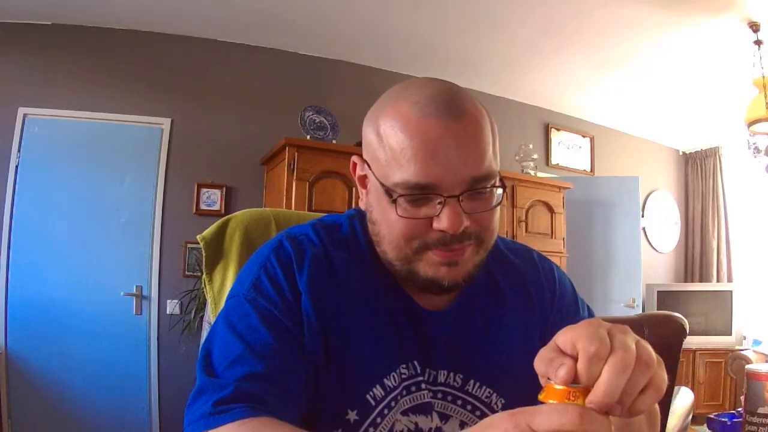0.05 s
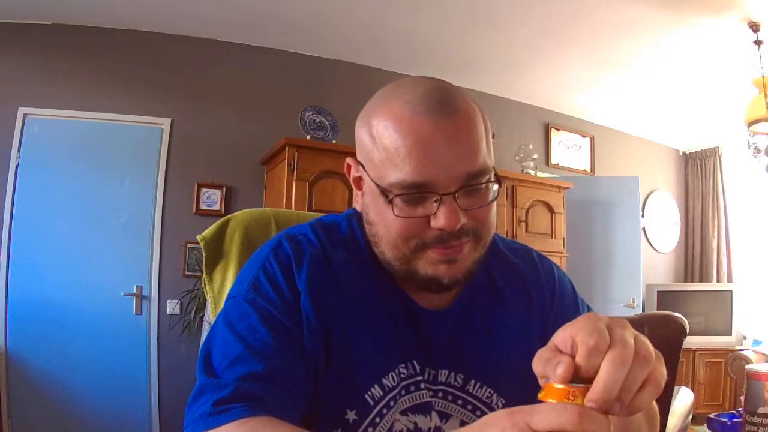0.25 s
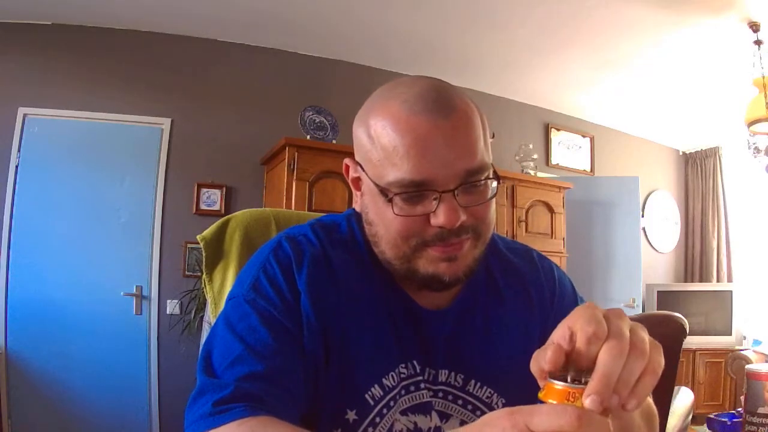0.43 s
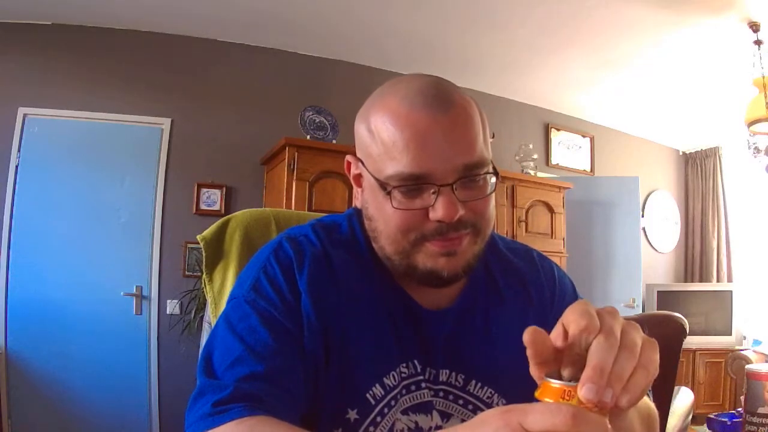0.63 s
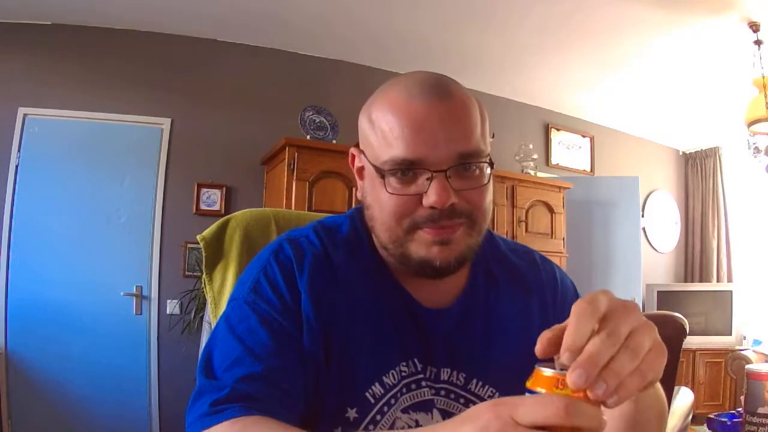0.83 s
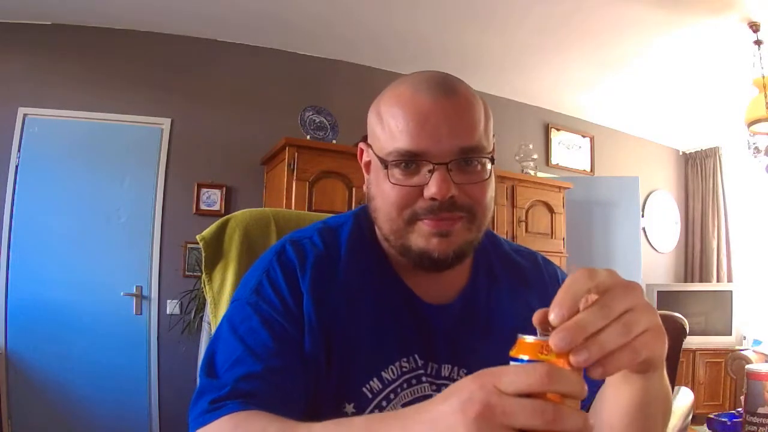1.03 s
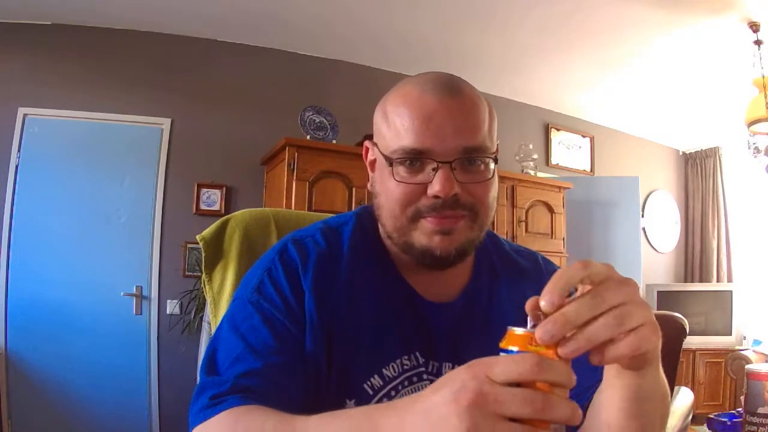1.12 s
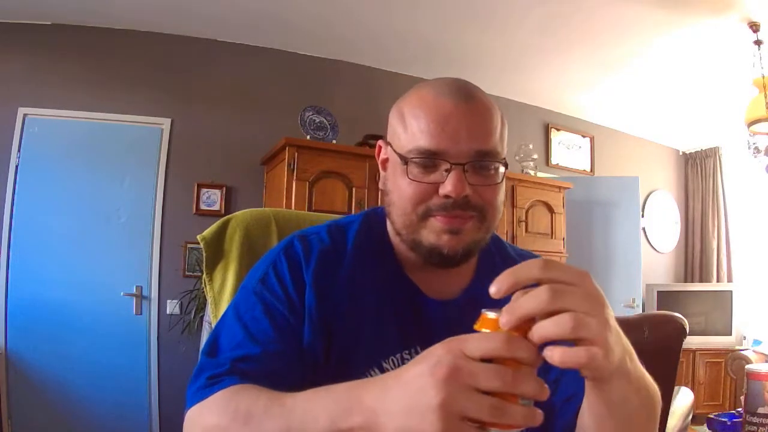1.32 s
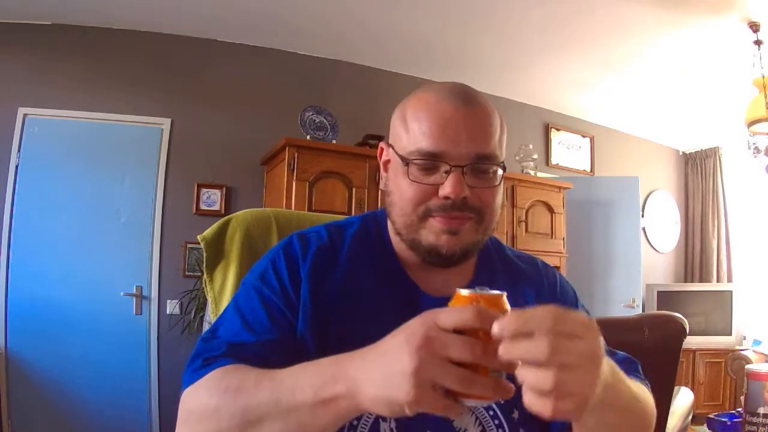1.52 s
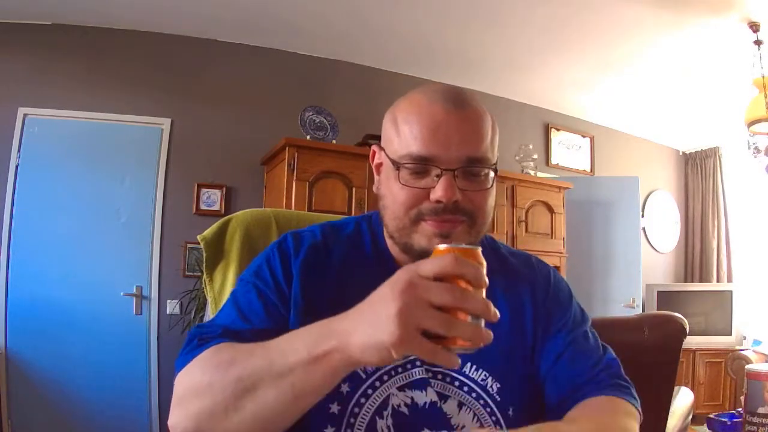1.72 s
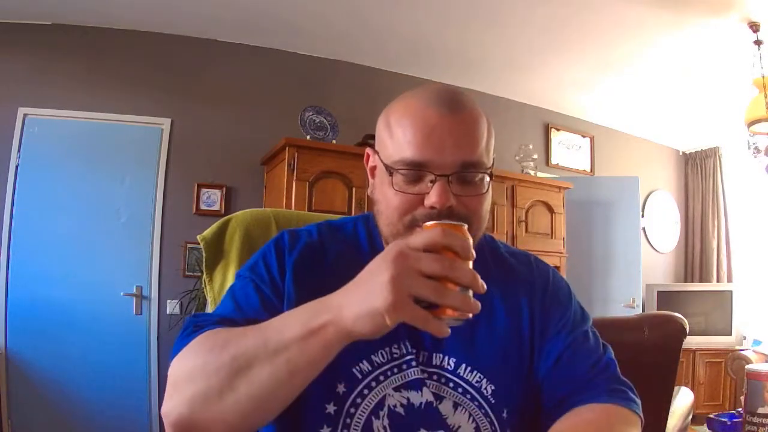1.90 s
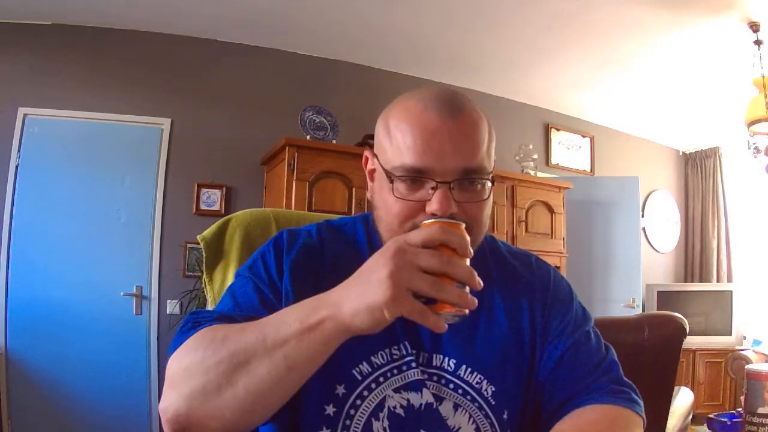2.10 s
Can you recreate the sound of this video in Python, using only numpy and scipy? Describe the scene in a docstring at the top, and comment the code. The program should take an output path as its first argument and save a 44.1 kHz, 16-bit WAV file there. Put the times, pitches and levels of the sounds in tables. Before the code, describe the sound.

A ring-pull can opens at about 0.14 seconds with a bright, hard snap, then a rapid stutter of tearing metal and a hollow pop rising in pitch until 0.25. Hiss fades by 0.5, with lighter clicks and a small tab twang near 0.4. Soft low room hum continues, with faint finger ticks around 1.1, 1.3 and 1.5, and dull chair bumps near 0.8, 1.5 and 2.1. Short room echo, close microphone.

```python
"""Ring-pull can in a quiet living room

A ring-pull can is opened at arm's length over a soft room tone, a low drone and a thin high whine.
The score line tears in a run of slips; each rings the aluminium lid and the air above the drink, whose
note mostly climbs as the hole grows. Gas hisses out and the folded tab twangs; later fingers tick
on the can and the chair bumps. Resonators struck by clicks or fed noise make these; delays add the room.
"""
import sys
import numpy as np
from scipy import signal
from scipy.fft import rfft, irfft
from scipy.io import wavfile

SR = 44100
rng = np.random.default_rng(int(sys.argv[2]) if len(sys.argv) > 2 else 0)


def invert_db(x):
    """Field ratio 10**(x/20) for x, a level in decibels (scalar or array-like)."""
    u = np.asarray(x, float) / 20
    return 10 ** u


def pcm_store(signal):
    """Save signal as 16-bit PCM."""
    levels = np.round(np.clip(np.atleast_2d(signal), -1, 1) * 32767)
    wavfile.write(sys.argv[1], SR, levels.astype(np.int16).T)


N = 94815   # length in samples
TIME_S = np.arange(N) / SR
DETUNE = .03   # random spread of lid and headspace tuning, as an rms share of pitch


def rms_one(x):
    """Scale to rms 1."""
    return x / np.sqrt(np.mean(x ** 2) + 1e-20)


def peak_one(x):
    """Scale to height 1."""
    return x / (np.max(np.abs(x)) + 1e-20)


def add(out, start_s, x):
    """Mix x in at its start time."""
    i = int(start_s * SR)
    out[i:i + len(x)] += x[:N - i]


def high_pass(x, order, cut_hz):
    """Take the bass away below the cut."""
    return signal.sosfilt(signal.butter(order, cut_hz, "high", fs=SR, output="sos"), x)


# Spectral shape of the room tone: pitch_hz [Hz], level_db [dB per Hz, relative]
ROOM_TONE_SHAPE = [(15, -25), (25, -10), (53, -3.5), (84, -10.5), (114, -5), (195, -6.5), (229, -9.5),
                   (301, -8), (624, -13), (714, -15), (887, -17), (1190, -17), (3340, -35.5), (13600, -47),
                   (16000, -50.5)]
# Wavering tones in the room: pitch_hz [Hz], width_hz [Hz], level_db [dB rms]
ROOM_HUM = [(150, 6.3, -64), (300, 9, -68.5)]
ROOM_TONE_DB, ROOM_TONE_CUT_HZ = -51, 36   # rms level, bass cut


def room_tone():
    """Noise coloured to the room's spectrum, with narrow noise bands heard as wavering hums."""
    hz = np.maximum(np.fft.rfftfreq(N, 1 / SR), 1)
    shape_hz, shape_db = np.transpose(ROOM_TONE_SHAPE)
    air_noise, hum_noise = rfft(rng.standard_normal((2, N)))
    colour = invert_db(np.interp(np.log(hz), np.log(shape_hz), shape_db))
    bass_cut = 1 / (1 + (ROOM_TONE_CUT_HZ / hz) ** 4)
    out = invert_db(ROOM_TONE_DB) * rms_one(irfft(air_noise * colour * bass_cut, N))
    for pitch_hz, width_hz, level_db in ROOM_HUM:
        narrow = 1 / (1 + (2 * (hz - pitch_hz) / width_hz) ** 2)
        out += invert_db(level_db) * rms_one(irfft(hum_noise * narrow, N))
    return out


DRONE_HZ, DRONE_DB = 49, -53.5   # centre pitch and level
DRONE_WAVER_DB, DRONE_WAVER_HZ = -0.5, 3.0   # size (sign flips it) and top speed of the level wander


def drone():
    """A low sine whose level and phase follow slow smoothed noise."""
    smooth = signal.butter(2, DRONE_WAVER_HZ, fs=100, output="sos")
    slow = signal.sosfilt(smooth, rng.standard_normal((2, 500)))[:, 200:]   # skip the filter's start
    slow_s = np.arange(300) / 100
    level, phase = (np.interp(TIME_S, slow_s, rms_one(v)) for v in slow)
    wave = np.sin(2 * np.pi * DRONE_HZ * TIME_S + 2.0 * phase)   # phase wander in radians
    return invert_db(DRONE_DB + DRONE_WAVER_DB * level) * wave


# Steady tones of a thin whine: pitch_hz [Hz], level_db [dB peak]
WHINE_TONES = [(13390, -97), (13473.6, -89), (13557, -89), (13640, -99)]


def whine():
    """Close, steady high sines beat together as one thin whine."""
    return sum(invert_db(level_db) * np.sin(2 * np.pi * pitch_hz * TIME_S) for pitch_hz, level_db in WHINE_TONES)


def burst(decay_ms):
    """One sharp click, then sparse uneven ones dying away; unit energy."""
    t = np.arange(SR // 5) / SR
    sparse = rng.standard_normal(len(t)) * (rng.random(len(t)) < .2)
    x = sparse * np.exp(-t * 1000 / decay_ms)
    x[0] = 1.82
    return x / np.sqrt(np.sum(x ** 2))


def ring(clicks, hz, t60_s):
    """A two-pole resonator: a unit click sets a decaying sine of starting height about 1 ringing."""
    radius = invert_db(-60 / (max(t60_s, .003) * SR))   # never rings shorter than 3 ms
    w = 2 * np.pi * hz / SR
    feedback = [1, -2 * radius * np.cos(w), radius * radius]
    return signal.lfilter([0, np.sin(w)], feedback, clicks + 1e-18)


# The air above the drink as the hole opens: time_s [s], pitch_hz [Hz, before detuning], t60_s [s]
HEADSPACE_NOTES = [(.14, 585, 0.015), (.176, 617, 0.017), (0.18, 770, 0.026), (.208, 837, 0.011),
                   (0.2107, 1058, 0.026), (0.218, 902, .025), (.27, 864, .03), (.3, 1093, .045),
                   (.35, 1110, 0.034), (.38, 1180, 0.071), (.41, 1223, 0.033), (.5, 1240, 0.032)]


def headspace(x, at_s):
    """The air above the drink: two resonators in a row give steep skirts, on a slightly unsteady note."""
    time_s, pitch_hz, t60_s = np.transpose(HEADSPACE_NOTES)
    hz = np.interp(at_s, time_s, pitch_hz) * (1 + DETUNE * rng.standard_normal())
    short_ring = ring(x, hz, .007)
    return ring(short_ring, hz, np.interp(at_s, time_s, t60_s))


# Ringing modes of the lid: pitch_hz [Hz, before detuning], level_db [dB, relative within
# its group, before chance], t60_s [s, held to at least 0.003]
LID_MODES = [(1076, -28.5, 0.12), (1360, -17.5, 0.024), (1697, -2, 0.01), (1857, 1.5, 0.015),
             (2039, -6.5, 0.016), (2577, -16.5, 0.014), (3256, 0.5, 0.0073), (3577, -5, 0.044),
             (3913, 5.5, 0.012), (4234, 3.5, 0.013), (4500, -1.5, 0.0088), (5045, -2, .015),
             (5730, -4.5, 0.005), (6235, -2.5, 0.022), (7330, -8, 0.0068), (8400, -8, 0.0068),
             (9500, -12, 0.0027), (11110, -10.5, 0.0067), (15500, -34.5, 0.0076)]
MODE_SPREAD_DB = 1.5   # chance in each mode's strength, rms
LID_CUT_HZ = 950   # the lid radiates little below its lowest mode


def lid(x, low_hz, high_hz):
    """The bending lid: one group of modes rings, with fresh strengths and tunings at every strike."""
    out = 0
    for k, (pitch_hz, level_db, t60_s) in enumerate(LID_MODES):
        if low_hz <= pitch_hz < high_hz:
            strength = invert_db(level_db + MODE_SPREAD_DB * rng.standard_normal()) * (-1) ** k
            hz = pitch_hz * (1 + DETUNE * rng.standard_normal())
            out = out + strength * ring(x, hz, t60_s)
    return high_pass(out, 4, LID_CUT_HZ)


CRACK_DB, CRACK_HZ, AIRY_DB = 8.5, 8050, -20.5   # snap gain before scaling, its dulling, its airy top


def crack(x):
    """The unresonant snap: a dulled click with a little of its airy top."""
    dulling = signal.butter(2, [3000, CRACK_HZ], "band", fs=SR, output="sos")
    airy = np.diff(x, prepend=0)
    return invert_db(CRACK_DB) * (signal.sosfilt(dulling, x) + invert_db(AIRY_DB) * airy)


# Slips of the score line: start_s [s], headspace_db, low_lid_db, middle_lid_db, high_lid_db
# [dB peak of each part, before the can's bass cut]
SCORE_SLIPS = [(.1424, -30, -5, -11, -20), (.146, -32, -13, -22, -28), (.152, -32, -16, -20, -28),
               (.155, -31, -13, -24, -30), (.158, -31, -10, -20, -28), (.1655, -33, -13, -17, -26),
               (.169, -32, -19, -21, -30), (.175, -35, -22, -25, -34), (.181, -31, -20, -20, -22),
               (.1885, -21, -20, -22, -18), (.193, -18, -16, -16, -21), (.197, -22, -20, -24, -28),
               (.204, -23, -20, -19, -30), (.209, -18, -18, -20, -20), (.2115, -13, -18, -18, -26),
               (.214, -22, -20, -19, -30), (.221, -27, -28, -24, -34), (.256, -28, -34, -32, -42),
               (.304, -26, -24, -25, -28), (.3065, -28, -28, -28, -32), (.314, -28, -34, -30, -42),
               (.320, -28, -30, -38, -40), (.330, -30, -32, -40, -46), (.343, -34, -36, -42, -48),
               (.350, -34, -38, -40, -42), (.370, -34, -38, -42, -30), (.373, -36, -40, -46, -34),
               (.376, -31, -36, -44, -38), (.387, -31, -33, -40, -31), (.404, -26, -28, -36, -44),
               (.407, -27, -32, -40, -46), (.430, -37, -50, -54, -58), (.45, -44, -56, -60, -64)]
SLIP_MS = 1.38   # time constant of a slip's clicks
MIDDLE_FROM_HZ, HIGH_FROM_HZ = 2800, 5300   # where the lid groups divide


def tearing():
    """The score line gives in slips; each shakes the headspace and the lid, and snaps."""
    out = np.zeros(N)
    for start_s, headspace_db, low_lid_db, middle_lid_db, high_lid_db in SCORE_SLIPS:
        x = burst(SLIP_MS)
        high = lid(x, HIGH_FROM_HZ, SR) + crack(x)
        slip = invert_db(headspace_db) * peak_one(headspace(x, start_s))
        slip += invert_db(low_lid_db) * peak_one(lid(x, 0, MIDDLE_FROM_HZ))
        slip += invert_db(middle_lid_db) * peak_one(lid(x, MIDDLE_FROM_HZ, HIGH_FROM_HZ))
        slip += invert_db(high_lid_db) * peak_one(high)
        add(out, start_s, slip)
    return out


# Swell and fade of the escaping gas: time_s [s], level_db [dB rms of the hiss, before the can's bass cut]
GAS_LEVEL = [(.142, -91.5), (.146, -35.5), (.22, -39), (.24, -41), (.3, -50.5), (.42, -56.5), (.52, -80),
             (.6, -100)]
BLOWN_DB = -16   # how loud the gas sounds the headspace, relative to the hiss


def gas():
    """Gas hisses through the tear, coloured by the lid, and sounds the headspace in overlapping puffs."""
    white = rng.standard_normal(N)
    hiss = np.zeros(N)
    for k, (pitch_hz, level_db, _) in enumerate(LID_MODES):
        tilt_db = -3.6 * np.log2(pitch_hz / 2000)   # duller by 3.6 dB per octave
        hiss += invert_db(level_db + tilt_db) * (-1) ** k * ring(white, pitch_hz, .005)
    blown = np.zeros(N)
    for start_s in np.arange(.13, .6, .01):
        puff = headspace(rng.standard_normal(3000), start_s)[-882:]   # 20 ms, once the note has built up
        add(blown, start_s, rms_one(puff) * np.hanning(882))
    level_db = np.interp(TIME_S, *np.transpose(GAS_LEVEL))
    return invert_db(level_db) * (rms_one(hiss) + invert_db(BLOWN_DB) * blown)


ROOM_T60_S, ROOM_DB, WALL_CUT_HZ = 0.42, -21, 6000   # decay before dulling, gain, treble cut per round


def room(x):
    """Ten feedback delays stand for the walls, their echoes duller on every round."""
    out = np.zeros(N)
    dull = np.exp(-2 * np.pi * WALL_CUT_HZ / SR)
    lags = (rng.uniform(.011, .04, 10) * SR).astype(int)
    for k, lag in enumerate(lags):
        loop, state = x.copy(), [0.]
        gain = invert_db(-60 * lag / SR / ROOM_T60_S)
        for i in range(lag, N, lag):
            back, state = signal.lfilter([gain * (1 - dull)], [1, -dull], loop[i - lag:i], zi=state)
            loop[i:i + lag] += back[:N - i]
        out += (loop - x) * (-1) ** k   # echoes only
    return out


def diffuse(x):
    """Three all-pass delays smear the echoes."""
    for lag in (73, 151, 229):   # samples
        a = np.zeros(lag + 1)
        a[[0, lag]] = 1, -.6
        x = signal.lfilter(a[::-1], a, x)
    return x


# Twangs of the folded tab: start_s [s], level_db [dB peak, before the can's bass cut], pitch_hz [Hz]
TAB_TWANGS = [(.388, -42, 3065), (0.403, -39, 3070), (0.424, -48, 3030)]
TAB_T60_S = .035


def tab():
    """The folded tab twangs: short clicks ring a single note."""
    out = np.zeros(N)
    for start_s, level_db, pitch_hz in TAB_TWANGS:
        add(out, start_s, invert_db(level_db) * peak_one(ring(burst(1.2), pitch_hz, TAB_T60_S)))
    return out


# Dull bumps of the chair: start_s [s], level_db [dB peak], pitch_hz [Hz]
CHAIR_BUMPS = [(.762, -45.5, 190), (1.521, -43.5, 502), (1.523, -43, 200), (1.543, -39.5, 120.2),
               (1.565, -49, 150), (2.095, -38, 150)]
BUMP_T60_S = .07


def bumps():
    """The chair bumps dully: short bursts ring a note and a weaker one above it."""
    out = np.zeros(N)
    for start_s, level_db, pitch_hz in CHAIR_BUMPS:
        x = burst(3.1)
        thud = ring(x, pitch_hz, BUMP_T60_S) - 0.25 * ring(x, 1.416 * pitch_hz, BUMP_T60_S)
        add(out, start_s, invert_db(level_db) * peak_one(thud))
    return out


# Fingers on the can: start_s [s], lid_db, headspace_db [dB peak of each part, before the can's bass cut]
FINGER_TICKS = [(1.082, -51, -64), (1.09, -51, -64), (1.278, -48, -49), (1.521, -49, -49)]


def ticks():
    """Finger ticks ring the lowest lid modes and the headspace."""
    out = np.zeros(N)
    for start_s, lid_db, headspace_db in FINGER_TICKS:
        x = burst(1.24)
        tick = invert_db(lid_db) * peak_one(lid(x, 0, 2300))
        tick += invert_db(headspace_db) * peak_one(headspace(x, start_s))
        add(out, start_s, tick)
    return out


CAN_CUT_HZ = 520   # a small can radiates little bass


def scene():
    """Can and chair with their echoes, over the room tone, drone and whine."""
    can = high_pass(tearing() + gas() + ticks() + tab(), 6, CAN_CUT_HZ)
    near = can + bumps()
    echoes = invert_db(ROOM_DB) * diffuse(room(near))
    return (near + echoes + room_tone() + drone() + whine())[None]


def top_cut(x):
    """Nothing passes above the cut-off."""
    return signal.sosfilt(signal.butter(12, 16660, fs=SR, output="sos"), x)


def record(dry):
    """Deliver the finished mix."""
    return top_cut(dry)


dry = scene()
out = record(dry)
pcm_store(out)
```